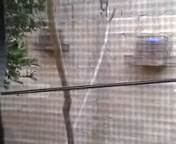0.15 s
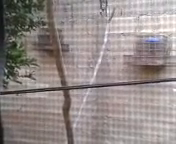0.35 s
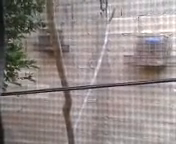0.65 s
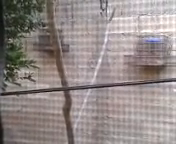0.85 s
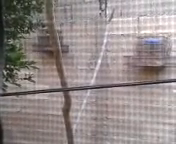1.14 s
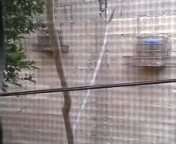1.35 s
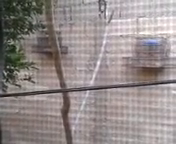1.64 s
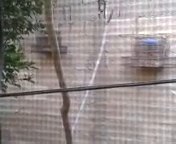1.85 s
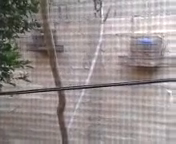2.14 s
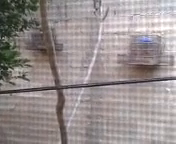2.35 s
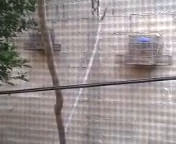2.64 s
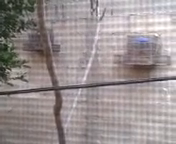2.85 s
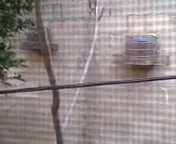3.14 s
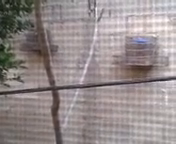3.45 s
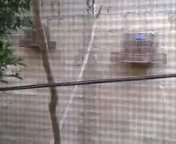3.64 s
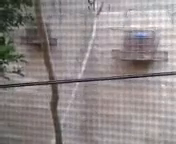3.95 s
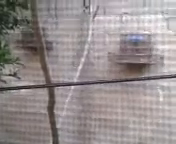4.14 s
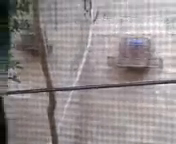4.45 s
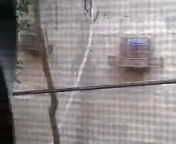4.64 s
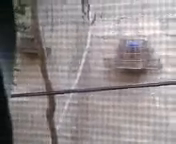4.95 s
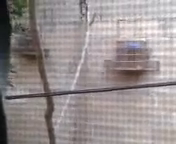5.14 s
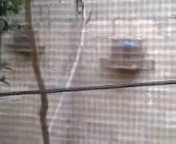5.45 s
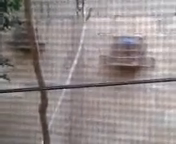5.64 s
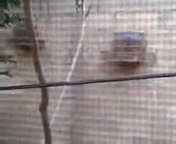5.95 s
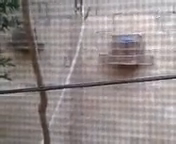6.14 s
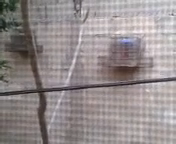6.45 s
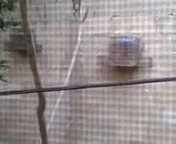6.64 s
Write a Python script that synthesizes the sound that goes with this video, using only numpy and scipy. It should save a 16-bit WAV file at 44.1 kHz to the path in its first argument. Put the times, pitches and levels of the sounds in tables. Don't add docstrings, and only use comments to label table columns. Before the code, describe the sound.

Through a window screen, birds are heard in a walled yard over low, faint traffic. One loud, piercing chip comes early, then a rapid trill rattles for a second with weak distant whistles. After a quieter gap, a nearer caged finch sings rising slurs alternating with level whistles, echoing off the walls. A long mellow whistle and a hoarse falling note close it. Small perch ticks, slight microphone handling rumble and band-limited, slightly gritty treble.

```python
import sys
import numpy as np
from scipy import signal
from scipy.fft import rfft, irfft, next_fast_len
from scipy.io import wavfile
from scipy.ndimage import uniform_filter1d, map_coordinates

SR = 44100
rng = np.random.default_rng(int(sys.argv[2]) if len(sys.argv) > 2 else 0)


def log_audio(samples):
    frames = np.atleast_2d(samples).T
    limited = np.clip(frames, -1, 1)
    pcm = np.round(limited * 32767).astype(np.int16)
    wavfile.write(sys.argv[1], SR, pcm)


def amplitude_ratio(level_db):
    exponent = np.asarray(level_db, float) / 20
    return 10 ** exponent


N = 299880


def unit(x):
    return x / np.sqrt(np.mean(x ** 2) + 1e-20)


def along(points, hz):
    f, value = np.transpose(points)
    return np.interp(np.log(hz + 1), np.log(f + 1), value)


def filtered(x, gain):
    size = next_fast_len(len(x) + 8192)
    return irfft(rfft(x, size) * gain(np.fft.rfftfreq(size, 1 / SR)), size)[:len(x)]


def wobble(rate, size):
    knots = rng.standard_normal(max(int(size * rate / SR) + 4, 128))
    return map_coordinates(knots, [np.arange(size) * rate / SR])


def lifts(rows):
    t = np.arange(N) / SR
    return sum(db * np.exp(-((t - s) / half) ** 2) for s, half, db in rows)


def add(track, s, sound):
    part = track[round(s * SR):][:len(sound)]
    part += sound[:len(part)]


def whistle(s, hz, partials_db, waver=.002, flutter_db=1, edge=.004, pace=60):
    t = np.arange(s[0], s[-1], 1 / SR)
    glide = np.interp(t, s, hz)
    pitch = uniform_filter1d(glide, 1 + len(t) // 14, mode="nearest")
    phase = 2 * np.pi * np.cumsum(pitch * (1 + waver * wobble(pace, len(t)))) / SR
    tone = np.zeros(len(t))
    for number, db in enumerate(partials_db, 1):
        level_db = np.interp(t, s, db) + flutter_db * wobble(pace, len(t))
        tone += amplitude_ratio(level_db) * np.sin(number * phase)
    ends = np.clip(np.minimum(t - s[0], s[-1] - t) / edge, 0, 1)
    return np.sqrt(2) * tone * ends


# (f/Hz, t60/s)
YARD_T60 = [(3000, 0.45), (5000, 0.37), (8000, 0.27)]
# (delay t/s, level/dB)
WALLS = [(.005, -6.5), (.0095, -8), (.014, -0.5), (0.022, -17), (0.0253, -1), (0.039, -15.5), (.047, -12),
         (0.069, -11), (0.095, -14.5)]


def yard(x, walls, echo_db, tail_db, scatter=0.):
    hz, t, z = signal.stft(rng.standard_normal(SR // 2), SR, nperseg=256)
    decay = amplitude_ratio(-60 * t / along(YARD_T60, hz)[:, None])
    tail = signal.istft(z * decay, SR, nperseg=256)[1]
    answer = amplitude_ratio(tail_db) * tail / np.linalg.norm(tail)
    for (late, db), shift in zip(walls, rng.standard_normal(len(walls))):
        answer[round(late * (1 + scatter * shift) * SR)] += amplitude_ratio(db)
    return np.pad(x, (0, len(answer) - 1)) + amplitude_ratio(echo_db) * signal.fftconvolve(x, answer)


# (f/Hz, level/dB per Hz)
STREET = [(76, -70.5), (130, -17), (210, -12.5), (248, -11), (293, -6), (440, -6), (606, -5.5), (752, -6.5),
          (1080, -8.5), (1780, -19.5), (2280, -17.5), (4000, -22.5), (6800, -23.5), (8840, -50)]
# (f/Hz, level/dB per Hz)
RUMBLE = [(7.1, -24), (12, -20.5), (19, -2), (32, -8), (57, -8), (102, -26), (130, -35), (170, -59.5),
          (290, -120)]
# (t/s, level/dB)
STREET_LEVEL = [(0, -50.5), (.2, -50), (3.6, -50), (4.799, -51), (5.3, -51), (6.8, -51)]
# (t/s, half length/s, rumble lift/dB)
BUMPS = [(.7, 0.16, 2), (1.6, .08, 6), (2.69, .07, 5), (3.05, .05, 2), (4.13, 0.092, 5.5),
         (5.25, 0.07, 10.5), (6.45, 0.066, 13.5), (6.8, .06, 12)]
# (t/s, half length/s, lift/dB)
REVS = [(.68, 0.11, 6.5), (1.6, .15, 5), (2.8, 0.19, 11.5), (3.52, 0.12, 8)]


def street():
    s, db = np.transpose(STREET_LEVEL)
    street_db = np.interp(np.arange(N) / SR, s, db)
    drone_db = -63.5 + 10 * (street_db - db.max()) + lifts(REVS) + 1.2 * wobble(13, N)
    air_db = street_db + 1.5 + 0.17 * wobble(4, N)
    rumble_db = -67 + lifts(BUMPS) + 2.2 * wobble(15, N)
    air = unit(filtered(rng.standard_normal(N), lambda f: amplitude_ratio(along(STREET[:-1], f))))
    low = unit(filtered(rng.standard_normal(N), lambda f: amplitude_ratio(along(RUMBLE, f))))
    drone = unit(filtered(rng.standard_normal(N), lambda f: 1 / (1 + ((f - 660) / 14) ** 2)))
    return amplitude_ratio(air_db) * air + amplitude_ratio(rumble_db) * low + amplitude_ratio(drone_db) * drone


# (t/s, level/dB, centre f/Hz, width/Hz, length/s)
TAPS = [(0.139, -46.5, 5050, 2510, 0.0056), (0.373, -45, 5540, 1800, 0.0044),
        (1.293, -36, 8000, 1200, .0004), (1.515, -57, 3310, 300, 0.019), (2.483, -51, 3500, 700, 0.0086),
        (3.374, -46.5, 5500, 3000, .004), (3.463, -55, 6800, 700, 0.0052),
        (4.112, -23, 4770, 4200, 0.00032), (4.195, -44.5, 4250, 1800, 0.007),
        (4.512, -45.5, 5340, 2200, 0.013), (4.81, -44, 5900, 350, 0.0042), (5.033, -56, 7000, 2500, 0.0027),
        (5.054, -28, 7200, 3500, 0.00059), (5.066, -40.5, 5900, 700, 0.0035),
        (5.231, -48.5, 5540, 2500, 0.0037)]


def taps():
    out = np.zeros(N)
    t = np.arange(SR // 10) / SR - .05
    for at, db, centre, width, length in TAPS:
        echo_db = -14 + 12 * np.log10(1000 * length)
        puff = 100 * length * rng.standard_normal(len(t)) * np.exp(-((t / length) ** 2))
        puff[len(t) // 2] += 1
        puff = filtered(puff, lambda f: np.exp(-(((f - centre) / width) ** 2)))
        tap = amplitude_ratio(db) * puff / np.abs(puff).max()
        add(out, at + t[0], yard(tap, WALLS, echo_db, tail_db=8, scatter=0.23))
    return out


# (t/s, length/s, first f/Hz, last f/Hz, level/dB)
FAR = [(0.36, 0.049, 4900, 4850, -69.5), (1.186, 0.049, 3150, 3330, -68), (1.405, 0.043, 4350, 4150, -73),
       (1.526, 0.036, 3230, 2920, -70), (1.701, 0.038, 2530, 2610, -66.5), (1.944, 0.046, 3510, 3445, -64),
       (2.061, 0.041, 3520, 3500, -66), (2.17, 0.06, 3500, 3500, -73.5), (2.291, 0.087, 3190, 2947, -62),
       (2.466, 0.023, 6650, 6750, -58), (2.665, 0.098, 3430, 3304, -61), (3.58, 0.073, 3660, 3620, -72)]


def far_whistles():
    out = np.zeros(N)
    for at, length, first, last, db in FAR:
        s = length * np.array([0, .4, 1])
        hz = [first, (first + last) / 2, last]
        swell_db = db + np.array([-8, 0, -5])
        tone = whistle(s, hz, [swell_db, swell_db - 20], waver=.008, flutter_db=3, pace=130)
        add(out, at, yard(tone, WALLS, echo_db=3, tail_db=-1, scatter=.2))
    return out


# (t/s from the start of its last fall, f/Hz, level/dB)
CHIP = [(-.024, 6570, -33.5), (-.021, 7460, -10), (-.016, 8240, -3), (-.012, 7570, 6), (-.004, 7350, -6.5),
        (0, 6750, -3), (.002, 6330, -12.5), (.0045, 5940, -15)]
# (t/s, level/dB, echo level/dB, punch 0-1)
CHIPS = [(0.368, -57.5, 1, 0.9), (0.542, -64, 3, 0.3), (1.083, -20.5, -12.5, 1), (3.89, -60, 4, 0.2),
         (5.53, -62, 3.5, 0.5), (3.642, -78.5, -14, 0.4)]


def chips():
    out = np.zeros(N)
    s, hz, shape_db = np.transpose(CHIP)
    for at, db, echo_db, punch in CHIPS:
        tone = whistle(s, hz, [punch * shape_db + db], edge=.0015)
        add(out, at + s[0], yard(tone, WALLS, echo_db, tail_db=9, scatter=0.032))
    return out


# (t/s from its peak, f/Hz, level/dB)
PEEP = [(-.036, 4450, 5), (-.028, 4510, -3.5), (-.018, 4400, -6)]
TICK = [(-.008, 5950, -9), (-.004, 6170, -18), (-.002, 6450, -8), (0, 6150, 0), (.004, 6000, -4.5)]
FLICK = [(.001, 7000, -14), (.005, 7870, -5.5), (.009, 7950, 1.5), (.014, 7740, -16)]
# (t/s, tick level/dB, flick level/dB)
TRILL = [(1.49, -54, -51.5), (1.551, -48, -51), (1.6107, -43.5, -39), (1.6705, -44.5, -39),
         (1.733, -40, -43), (1.7933, -38.5, -53), (1.857, -40, -50), (1.9184, -39.5, -50),
         (1.9804, -38.5, -41.5), (2.043, -43, -50), (2.105, -44.5, -42), (2.1675, -46.5, -40),
         (2.2326, -35.5, -42), (2.2949, -44, -46), (2.359, -42.5, -46), (2.4214, -46.5, -43),
         (2.484, -36.5, -39)]


def trill():
    out = np.zeros(N)
    for at, tick_db, flick_db in TRILL:
        detune, peep_luck = rng.standard_normal(2)
        # part, level dB, pitch stretch, echo dB, tail dB
        parts = [(TICK, tick_db - 4, 1 + .01 * detune, -6, -1),
                 (FLICK, flick_db, 1, 3, 8),
                 (PEEP, -65 + 1.5 * peep_luck, 1 + .02 * detune, -2, -1)]
        for part, level_db, stretch, echo_db, tail_db in parts:
            s, hz, shape_db = np.transpose(part)
            tone = whistle(s, hz * stretch, [shape_db + level_db], edge=.0022)
            add(out, at + s[0], yard(tone, WALLS[:3], echo_db, tail_db, scatter=.25))
    return out


# (t/s, f/Hz, effort level/dB)
SLUR = [(6.05, 1334, -69), (6.101, 1515, -55.5), (6.15, 1633, -51.5), (6.219, 1675, -54),
        (6.309, 1754, -50.5), (6.42, 1774, -52), (6.55, 1842, -54), (6.68, 1815, -53.5),
        (6.81, 1834, -54.5)]
# (f/Hz, level/dB)
BEAK = [(1720, -20), (1850, -7), (3000, 5.5), (3700, -1), (4800, -35), (5300, -6), (6300, -40), (7300, -13)]


def slur():
    out = np.zeros(N)
    s, hz, effort_db = np.transpose(SLUR)
    partials_db = [effort_db + along(BEAK, k * hz) for k in range(1, 5)]
    tone = whistle(s, hz, partials_db, waver=.0006, flutter_db=1, pace=30)
    add(out, s[0], yard(tone, WALLS, echo_db=-9, tail_db=2.5, scatter=.1))
    return out


# (peak level/dB, pitch path of (t/s, f/Hz))
RISES = [(-51, [(3.765, 4700), (3.8, 5030), (3.835, 5190), (3.865, 5520)]), (-31.5, [(4.075, 4810),
         (4.105, 4757), (4.14, 5050), (4.175, 5284), (4.195, 5234), (4.212, 5520)]), (-28, [(4.4, 4580),
         (4.428, 4558), (4.46, 4840), (4.5, 5100), (4.535, 5420)]), (-26.5, [(4.722, 3980), (4.745, 4385),
         (4.79, 4606), (4.825, 4976), (4.855, 5410), (4.872, 5430)]), (-26, [(4.908, 3800), (4.94, 4086),
         (4.985, 4540), (5.002, 5050), (5.035, 5210), (5.05, 5500)])]
# (share of its length, level/dB)
RISE_SWELL = [(0, -22), (0.201, -6), (.55, -4.5), (.72, 0), (1, -12)]


def rises():
    share, swell_db = np.transpose(RISE_SWELL)
    for db, path in RISES:
        s, hz = np.transpose(path)
        turns = s[0] + (s[-1] - s[0]) * share
        t = np.union1d(s, turns)
        yield t, np.interp(t, s, hz), db + np.interp(t, turns, swell_db), np.full(len(t), -36)


# (t/s, length/s, scoop/s, held f/Hz, level/dB)
HOLDS = [(3.88, .105, .062, 3010, -39), (4.215, .123, .04, 3135, -35.5), (4.535, .13, .05, 3150, -32.5)]
# (share of the scoop, offset f/Hz, offset level/dB, octave level/dB)
SCOOP = [(0, -330, -22, -6), (.6, -130, -12, -9), (1, 0, 0, -25)]


def holds():
    share, under_hz, under_db, over_db = np.transpose(SCOOP)
    for at, length, scoop, hz, db in HOLDS:
        s = at + np.r_[scoop * share, length - .015, length]
        yield s, hz + np.r_[under_hz, 0, -90], db + np.r_[under_db, 0, -7], np.r_[over_db, -26, -26]


# (t/s, length/s, first f/Hz, last f/Hz, level/dB)
GRACES = [(4.517, .024, 3340, 2780, -47), (5.054, .014, 4300, 2600, -54)]


def graces():
    for at, length, first, last, db in GRACES:
        yield at + np.array([0, length]), np.array([first, last]), np.full(2, db), np.full(2, 1)


# (t/s, f/Hz, level/dB)
FALL = [(6.3, 4900, -52), (6.37, 4690, -51), (6.392, 4710, -41), (6.402, 4620, -34.5), (6.48, 4397, -35),
        (6.53, 4302, -41), (6.655, 4022, -42), (6.705, 4006, -53.5), (6.8, 4080, -53)]


def notes():
    yield from rises()
    yield from holds()
    yield from graces()
    yield *np.transpose(FALL), np.full(len(FALL), -46)


# (delay t/s, level/dB)
PERCH_WALLS = [(.0075, -2.5), (0.0134, -24), (0.0187, -1.5), (0.029, -8.5), (0.038, -19), (0.048, -11.5),
               (.054, -8.5), (0.063, -12)]
# (f/Hz, echo level/dB)
BEAMING = [(3000, -9), (4300, -2.5), (5300, -1)]
# (f/Hz, level/dB)
FAR_WALL = [(3200, -16), (4200, -28), (6000, -34)]
# (glide/Hz per s, share of pitch)
STRAIN = [(3000, .0015), (6000, .004)]
# (t/s, f/Hz, level/dB)
RASP = [(6.3, 4750, -59), (6.32, 4200, -55), (6.34, 3800, -50), (6.365, 4000, -57), (6.397, 3720, -57)]


def singer():
    out = np.zeros(N)
    for s, hz, db, over_db in notes():
        glide = np.ptp(hz) / np.ptp(s)
        tone = whistle(s, hz, [db, db + over_db], waver=along(STRAIN, glide))
        add(out, s[0], yard(tone, PERCH_WALLS, along(BEAMING, hz.mean()), tail_db=-3))
        add(out, s[0] + 0.096, filtered(tone, lambda f: amplitude_ratio(along(FAR_WALL, f))))
    s, hz, db = np.transpose(RASP)
    rasp = whistle(s, hz, [db], waver=.03, flutter_db=5, pace=600)
    add(out, s[0], yard(rasp, PERCH_WALLS, echo_db=-1.5, tail_db=-4.5))
    return out


def scene():
    birds = far_whistles() + chips() + trill() + slur() + singer()
    return (street() + taps() + birds)[None]


def low_pass(x):
    return signal.sosfilt(signal.butter(12, 9040, fs=SR, output="sos"), x)


# (f/Hz, level/dB)
INTAKE = [(6800, -0.5), (7200, -3), (7500, -13.5), (7800, -16.5), (7980, -33)]
# (f/Hz, level/dB)
OUTLET = [(7000, 0), (7600, -11), (8200, -16.5), (8700, -31), (9100, -36), (9400, -70)]


def record(dry):
    rate_hz = 16000
    taken = filtered(dry[0], lambda f: amplitude_ratio(along(INTAKE, f)) * np.clip((rate_hz / 2 - f) / 90, 0, 1))
    mirror = 2 * taken * np.cos(2 * np.pi * rate_hz * np.arange(N) / SR)
    played = filtered(taken + mirror, lambda f: amplitude_ratio(along(OUTLET, f)) * (f < 9500))
    mix = played[None] + .0043
    return low_pass(mix)


dry = scene()
out = record(dry)
log_audio(out)
```